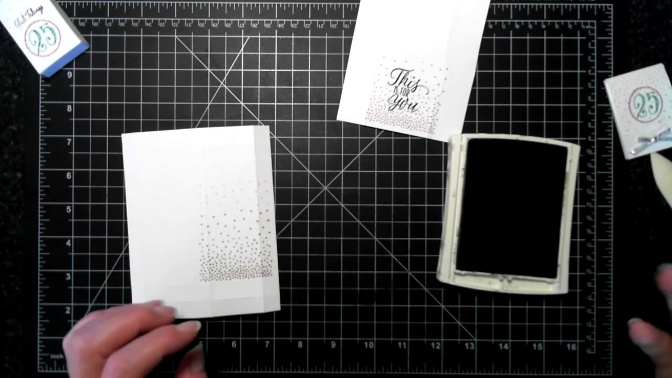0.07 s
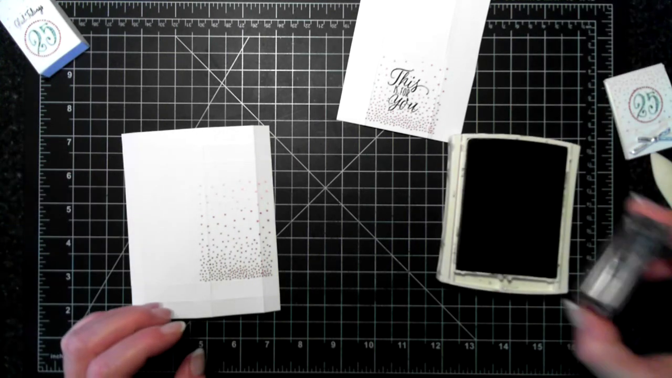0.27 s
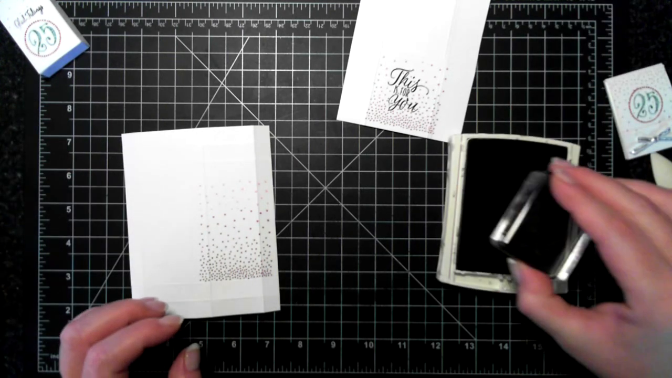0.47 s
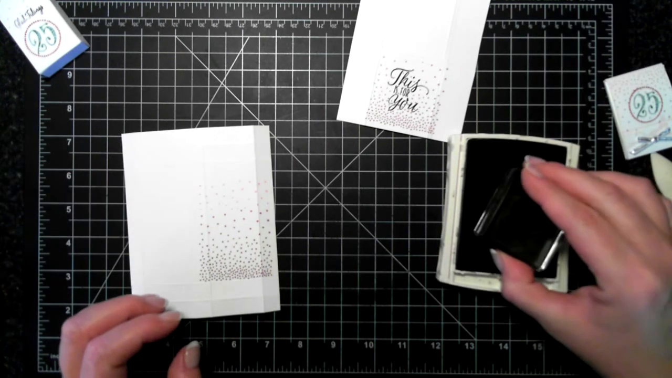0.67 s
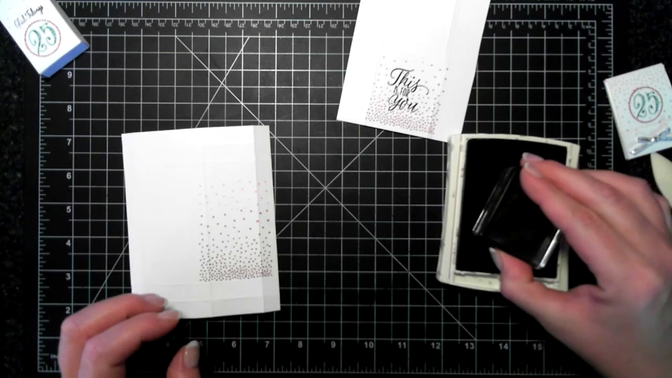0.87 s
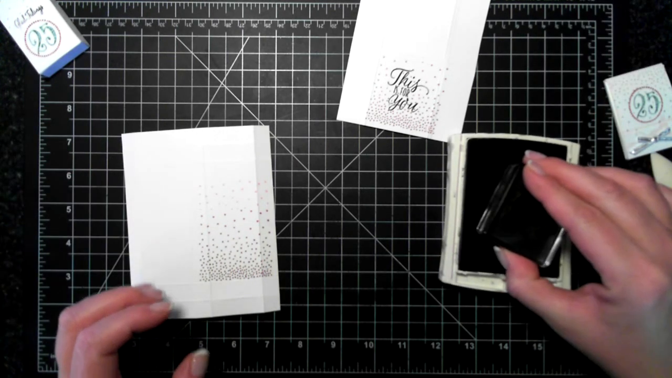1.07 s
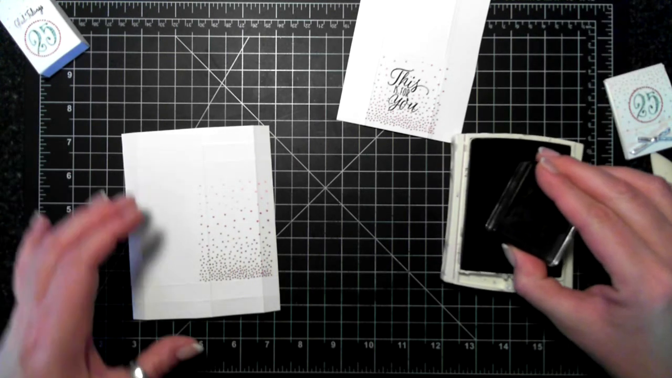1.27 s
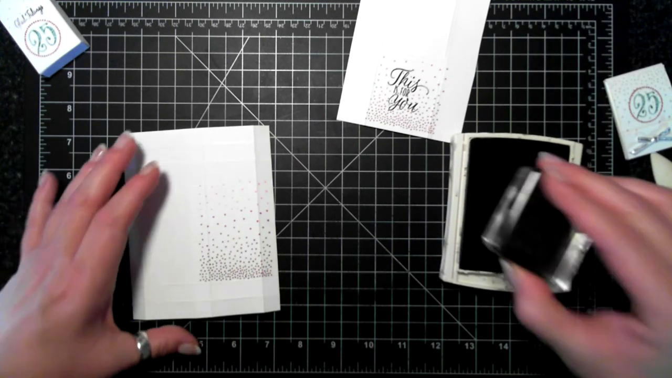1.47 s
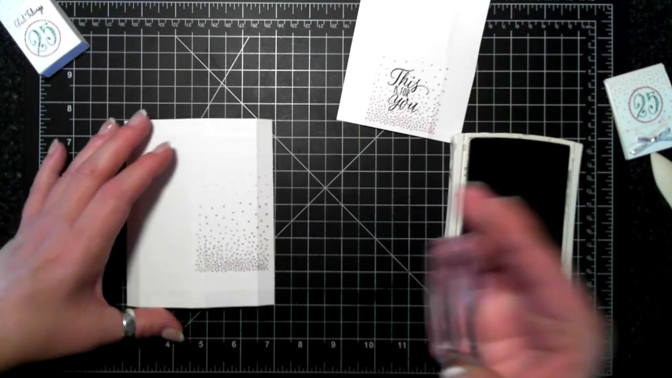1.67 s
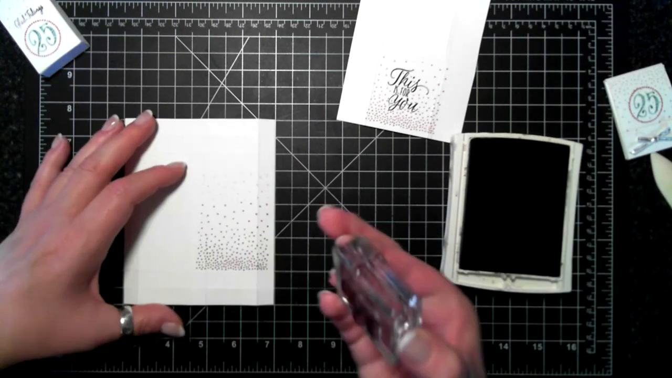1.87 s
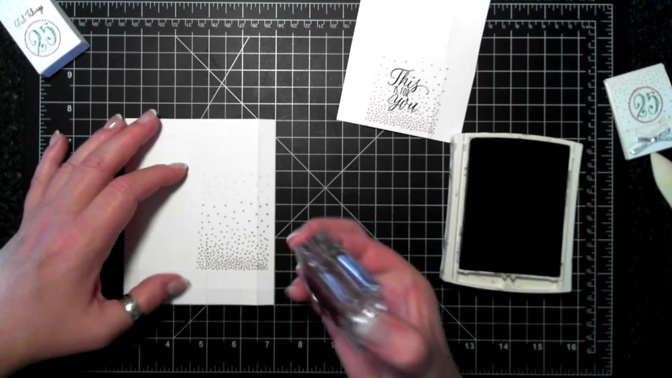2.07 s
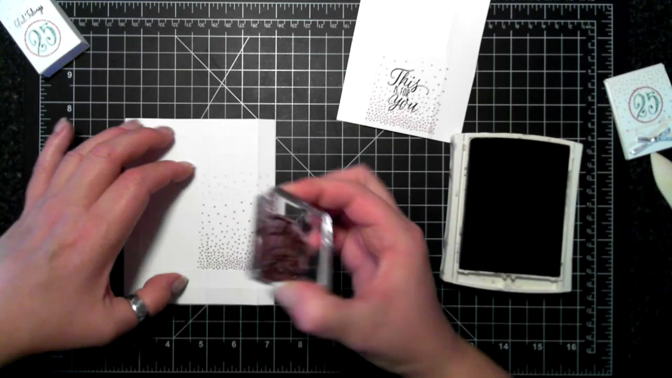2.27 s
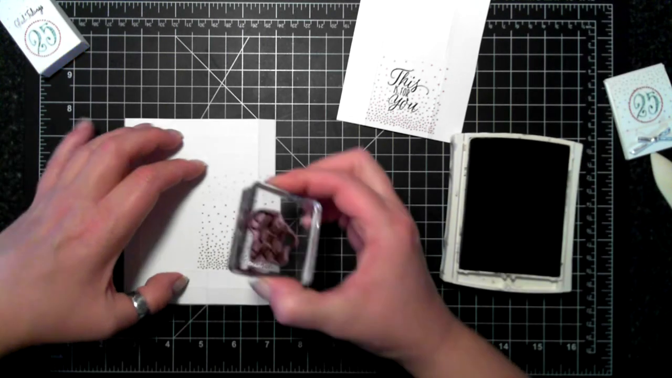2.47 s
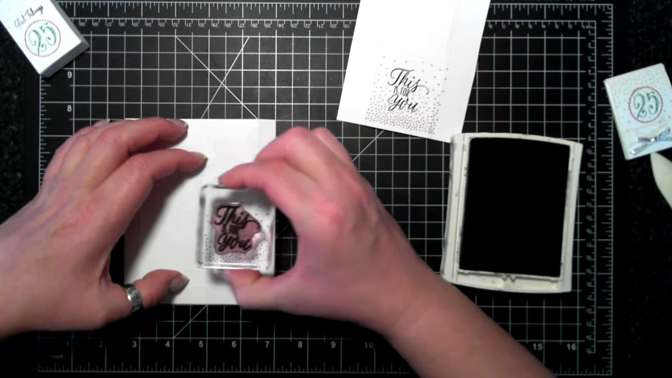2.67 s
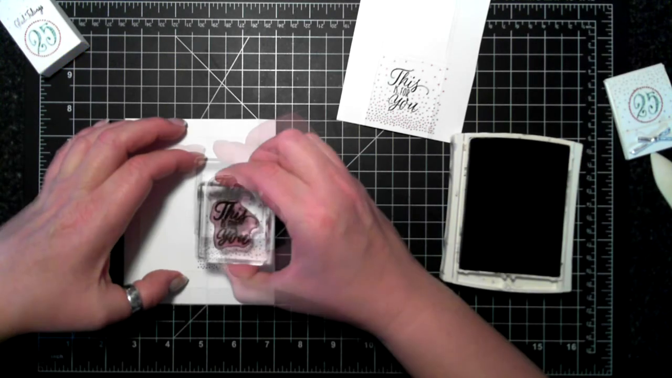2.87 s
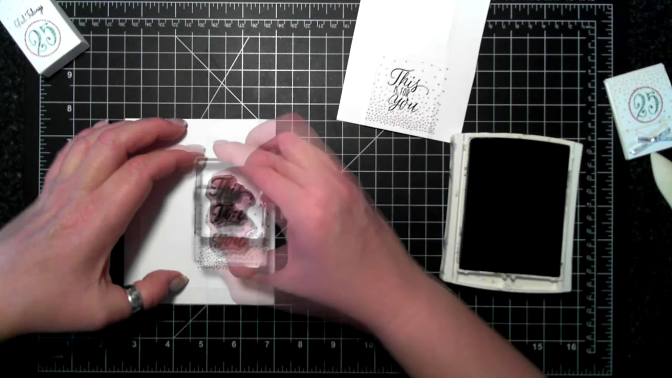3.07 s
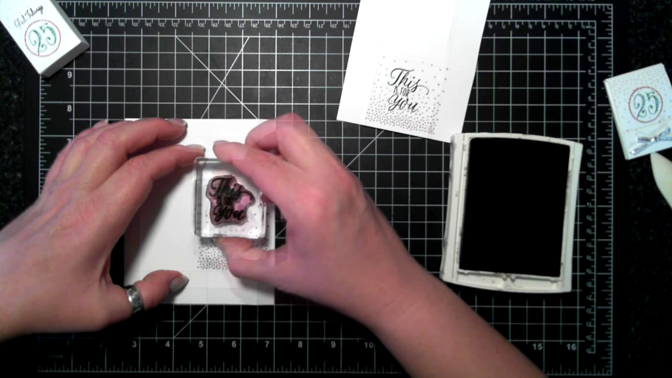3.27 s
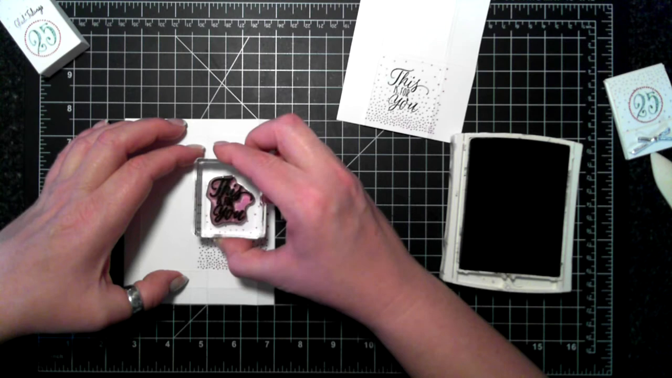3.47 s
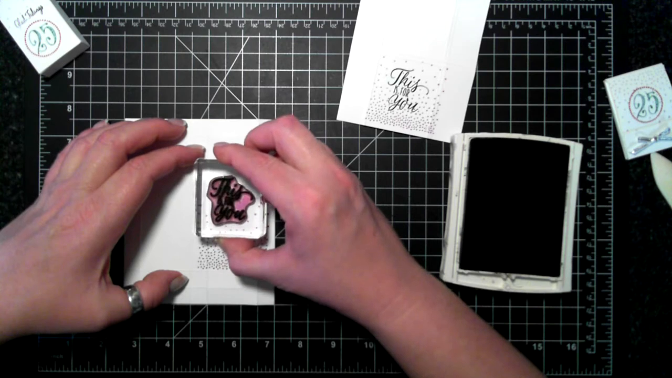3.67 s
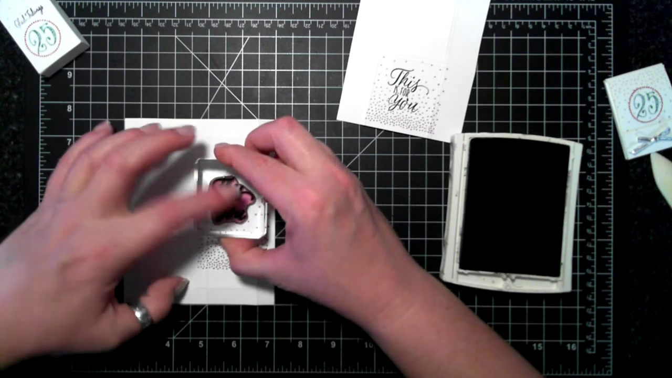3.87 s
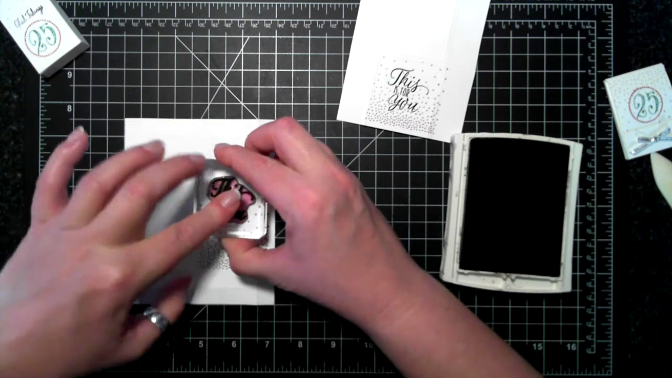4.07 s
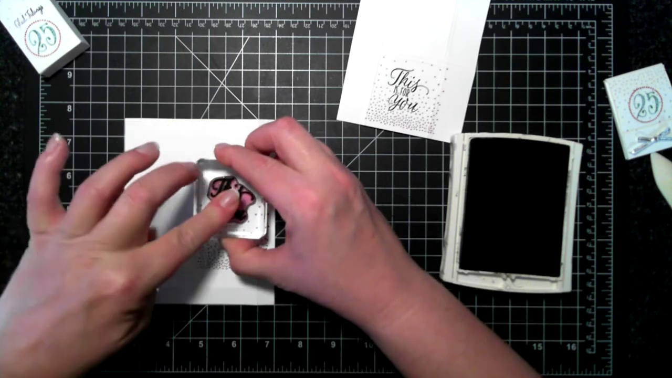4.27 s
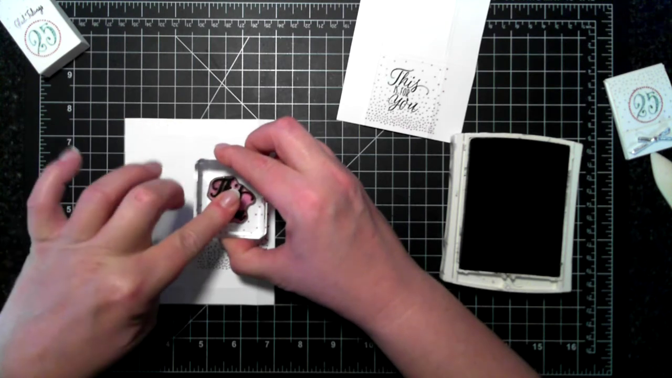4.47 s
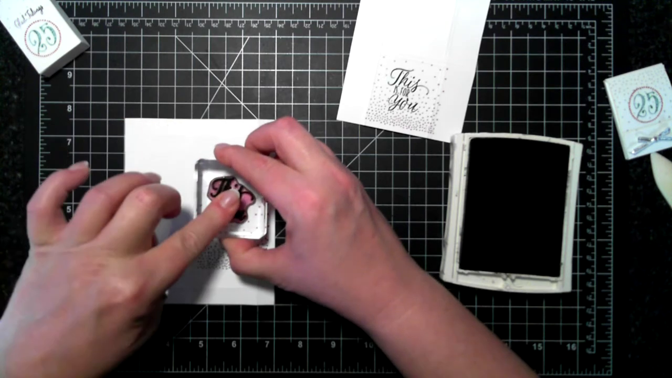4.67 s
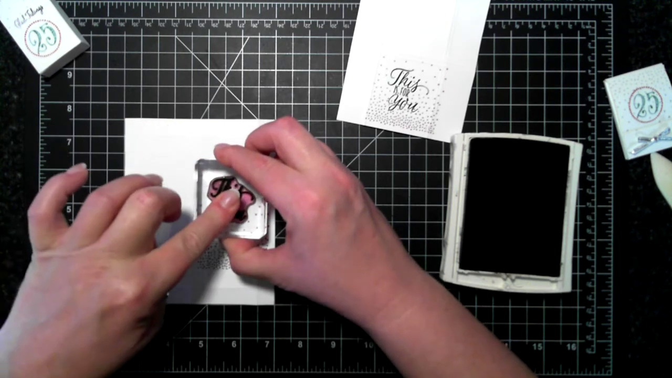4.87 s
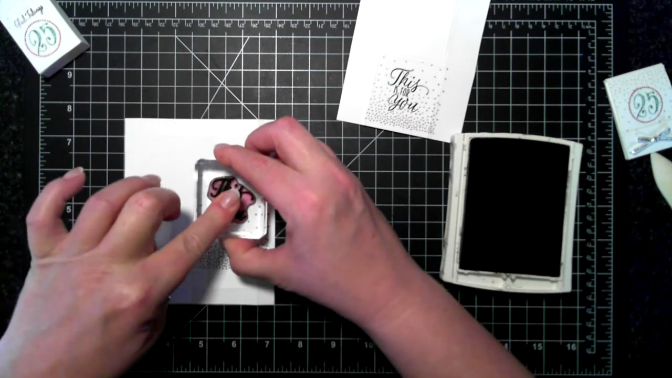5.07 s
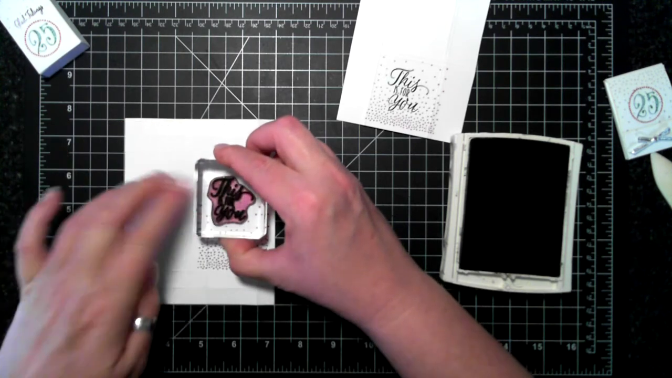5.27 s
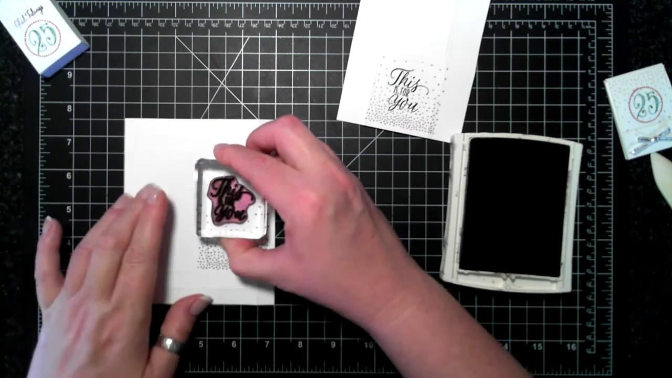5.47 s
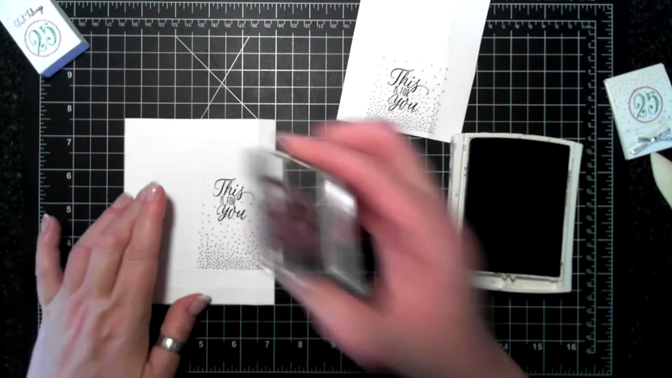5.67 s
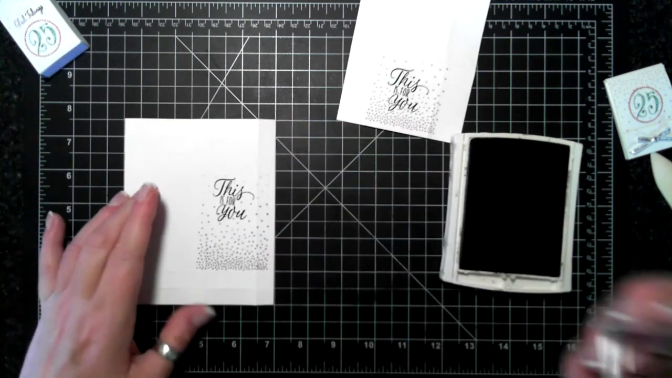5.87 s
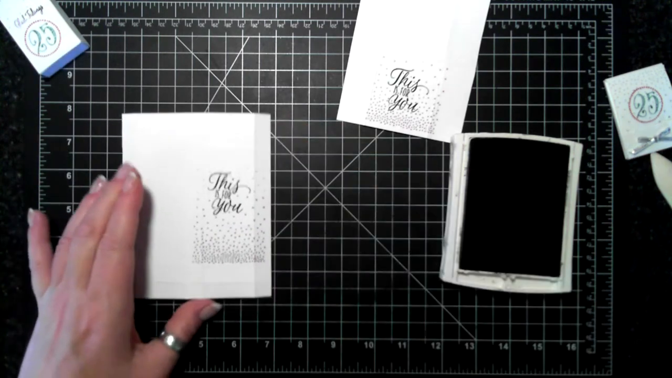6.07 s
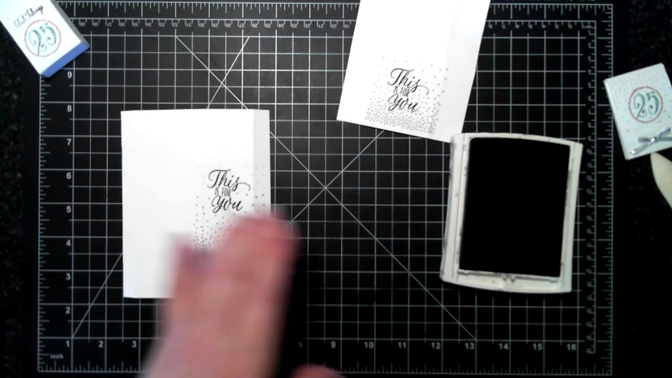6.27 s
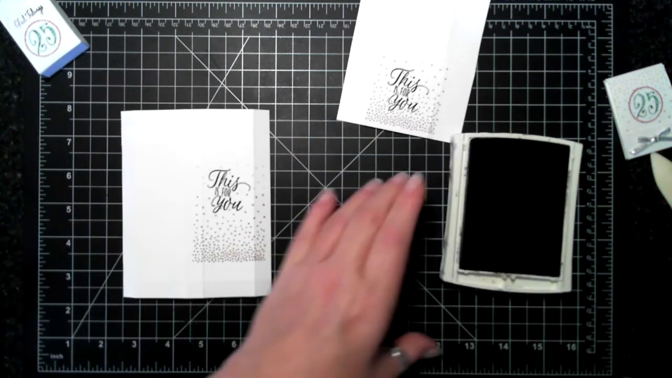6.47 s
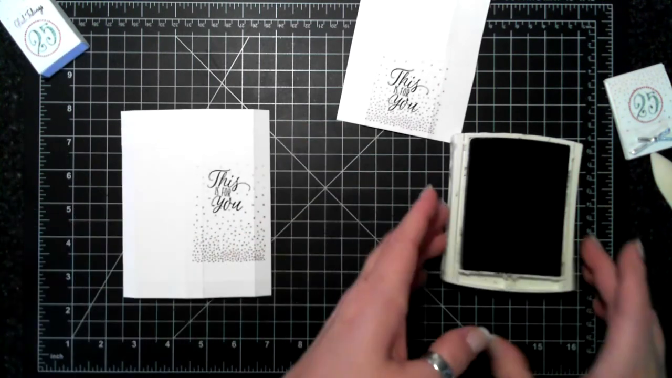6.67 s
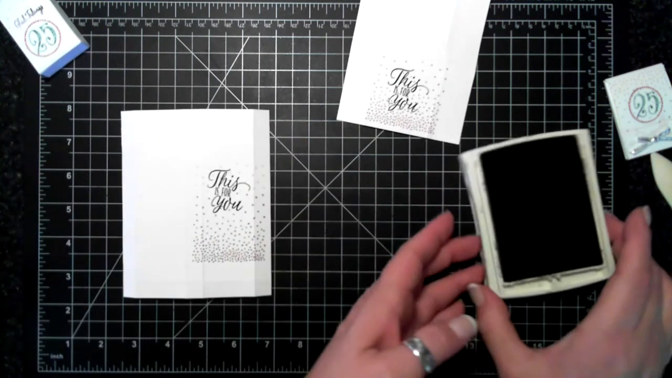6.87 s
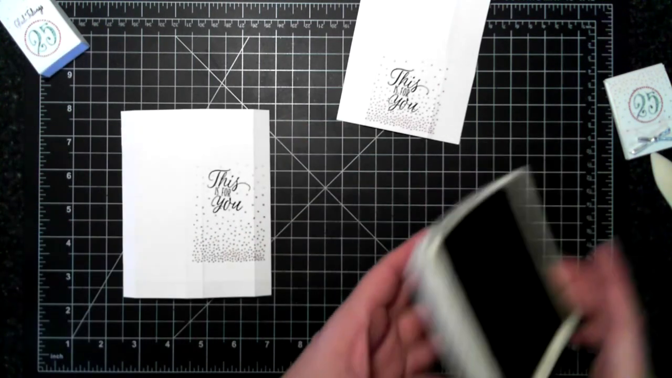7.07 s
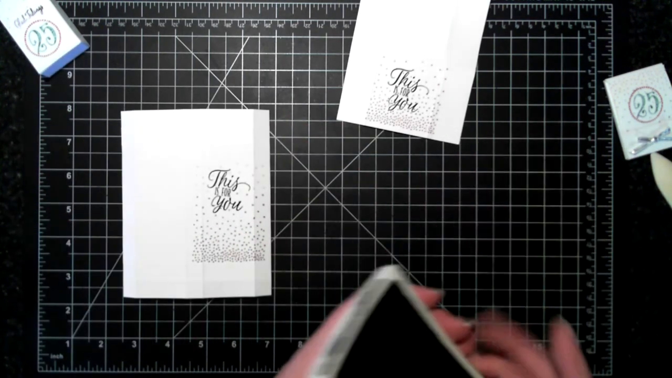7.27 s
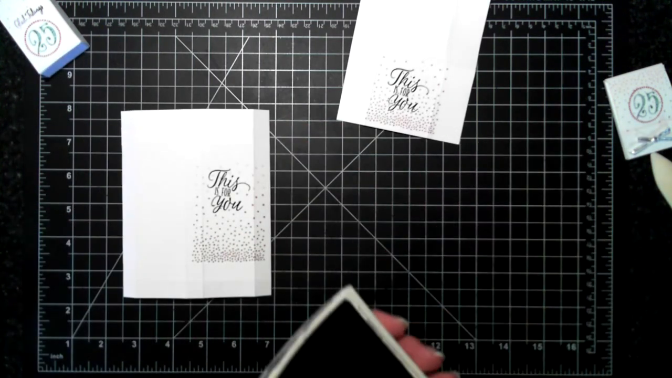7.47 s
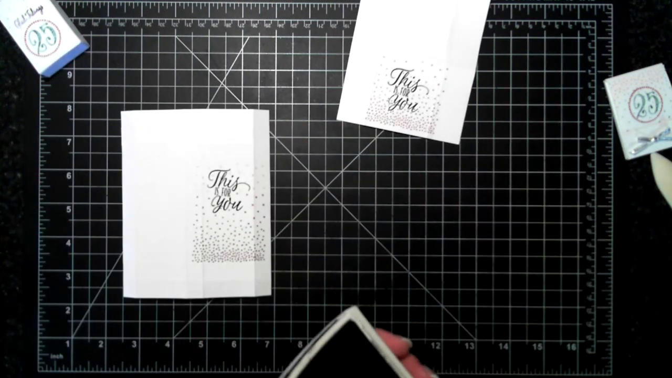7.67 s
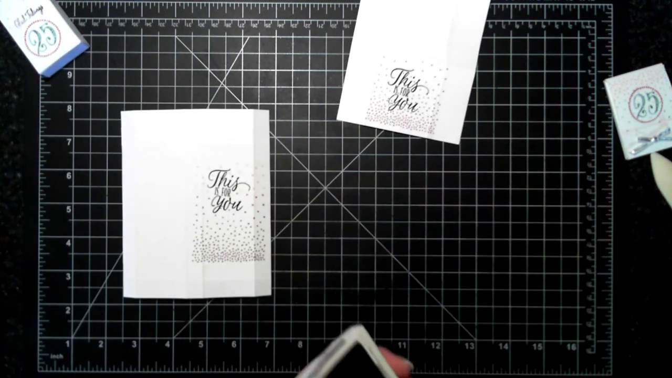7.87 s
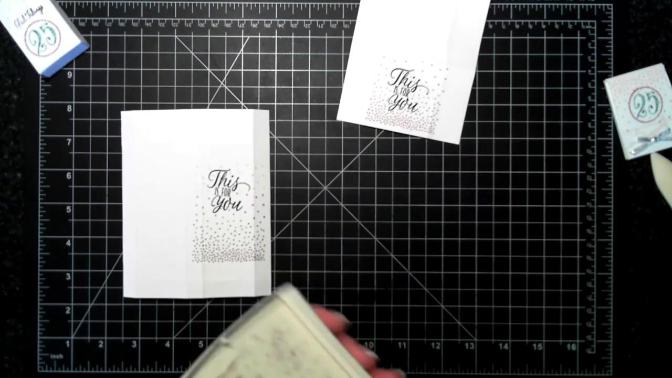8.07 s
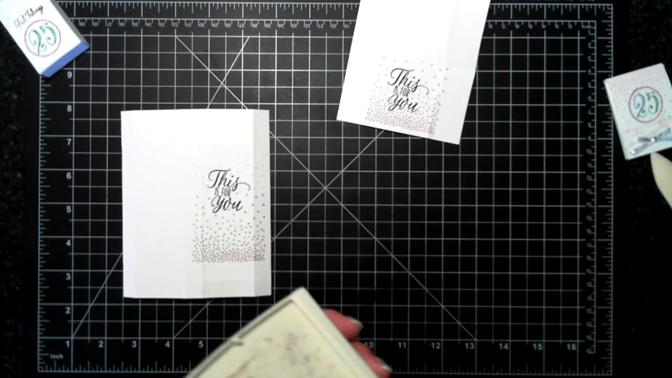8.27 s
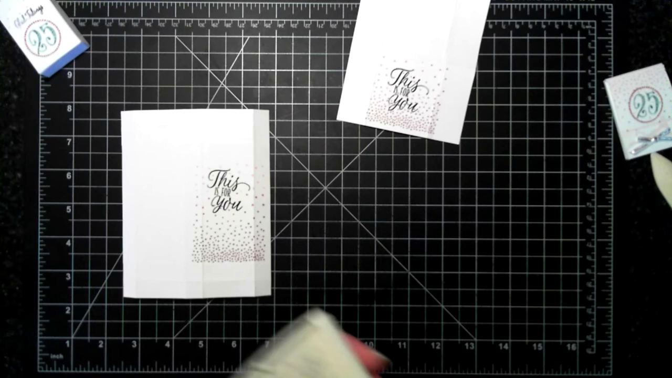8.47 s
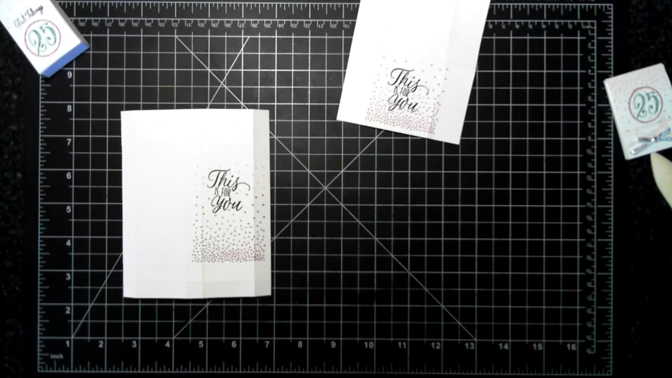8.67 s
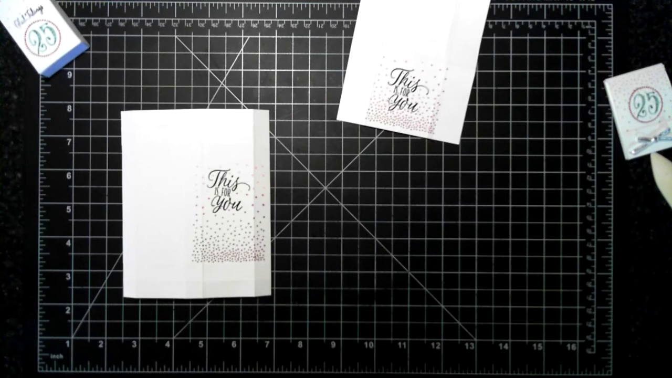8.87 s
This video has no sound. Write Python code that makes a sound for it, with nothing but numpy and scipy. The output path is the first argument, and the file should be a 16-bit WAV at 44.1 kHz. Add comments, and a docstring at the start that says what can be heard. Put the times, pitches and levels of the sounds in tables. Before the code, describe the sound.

A stamp block is dabbed five times on a plastic ink pad, each dab a dull knock with a sticky lighter release. Card slides briefly on a mat; the block settles with a soft thump and is pressed quietly. It peels off with a bright dry tick, drops hard with quick bounces, and the pad case clatters closed. Low hum throughout, short dry room, one microphone above the desk.

```python
"""Hands tap an acrylic stamp block on an ink pad, press it on card, peel it off, drop it on the desk
and then shut the pad's plastic case. A motor hums in the quiet room; one microphone hangs above the desk.
Knocks are short noisy rattles that ring the modes of case, block or card; thumps are soft pushes on the desk.
Rubs are noisy slips heard through the rubbed thing. The hum is wavering sines, the air is shaped noise,
and decaying sparse taps give the room's echoes."""
import sys
import numpy as np
from scipy import signal
from scipy.fft import rfft, irfft
from scipy.io import wavfile
from scipy.ndimage import uniform_filter1d

SR = 44100
rng = np.random.default_rng(int(sys.argv[2]) if len(sys.argv) > 2 else 0)


def generate_wav(signal):
    """Clip the signal to [-1, 1] and save it as 16-bit WAV at the path in sys.argv[1]."""
    frames = np.transpose(np.atleast_2d(signal))
    scaled = np.clip(frames, -1, 1) * 32767
    pcm = np.round(scaled).astype(np.int16)
    wavfile.write(sys.argv[1], SR, pcm)


N = 394342  # length [samples]


def gain_of(db):
    """Turns decibels into an amplitude factor."""
    return 10 ** (np.asarray(db) / 20)


def unit_rms(x):
    """Scales a sound to rms 1."""
    return x / np.sqrt(np.mean(x ** 2) + 1e-20)


def read_curve(points, hz):
    """Reads a curve along a logarithmic frequency axis."""
    point_hz, value = np.transpose(points)
    return np.interp(np.log(hz + 1), np.log(point_hz + 1), value)


def add(mix, start_s, sound):
    """Lays a sound into the mix, cut off at the end of the mix."""
    part = mix[round(start_s * SR):][:len(sound)]
    part += sound[:len(part)]


def without_bass(x, hz, order=2):
    """Takes away the bass below hz."""
    return signal.sosfilt(signal.butter(order, hz, "high", fs=SR, output="sos"), x)


def wander(top_hz):
    """Slow chance of rms 1: sines of random phase, the slowest largest."""
    t = np.arange(0, N, 256) / SR
    slow = np.zeros(len(t))
    for hz in np.geomspace(top_hz / 20, top_hz, num=20):
        slow += np.sin(2 * np.pi * (hz * t + rng.random())) / np.sqrt(hz)
    return np.interp(np.arange(N) / SR, t, unit_rms(slow))


def ring(modes, spread=0., tilt_db=0., favoured_hz=1000, favour_db=0., seconds=.07):
    """An object after one ideal blow: each mode is a pair of partials, which spread detunes by chance
    for a denser ring."""
    t = np.arange(int(seconds * SR)) / SR
    hz, db, t60 = np.repeat(modes, 2, axis=0).T[:, :, None]
    t60 = np.minimum(t60, np.maximum(28 / hz, .008))  # hands and mat stop any long ring
    louder, higher = rng.standard_normal((len(hz), 2)).T[:, :, None]
    # the spot struck favours some modes
    spot_db = favour_db * np.exp(-(np.log2(hz / favoured_hz) / 0.21) ** 2)
    start_db = db + tilt_db * np.log2(hz / 1000) + spot_db + spread * louder
    decay = gain_of(start_db - 60 * t / t60)
    partial_hz = hz * (1 + spread * higher / 50)
    return (decay * np.sin(2 * np.pi * partial_hz * t)).sum(axis=0)


def knocks(rows, modes, low_hz, rise_ms, contact_ms, cling, favour_db):
    """Each contact is a short rattle that rings the object; a hard one favours the high modes."""
    out = np.zeros(N)
    ms = 1000 * np.arange(4096) / SR
    pressure = (1 - np.exp(-ms / rise_ms)) * np.exp(-(ms / contact_ms) ** cling)
    for start_s, db, hardness_db, favoured_hz in rows:
        jolts = rfft(pressure * rng.standard_normal(len(ms)))
        # level the spectrum so that the rattle drives all modes alike
        even = jolts / np.sqrt(uniform_filter1d(abs(jolts) ** 2, size=25))
        rattle = irfft(even) * (ms < 4 * contact_ms + 2)
        body = ring(modes, 0.99, hardness_db, favoured_hz, favour_db)
        sound = without_bass(signal.fftconvolve(rattle, body), low_hz, order=4)
        # same energy as noise of the given rms level over the contact time
        sound *= np.sqrt(SR * contact_ms / 1000) / np.linalg.norm(sound)
        add(out, start_s, gain_of(db) * sound)
    return out


def stroke(rows, grain_db, lean):
    """Friction: dense slips of uneven size; pressure swells and ebbs in one arch, early for a lean under 1."""
    level = np.zeros(N)
    for start_s, length_s, db in rows:
        arch = np.sin(np.pi * np.linspace(0, 1, round(length_s * SR)) ** lean) ** 1.5
        add(level, start_s, gain_of(db) * arch)
    grain = unit_rms(uniform_filter1d(rng.standard_normal(N), size=150))
    slips = unit_rms(gain_of(grain_db * grain) * rng.standard_normal(N))
    return level, slips


def as_modes(peaks):
    """A wide resonance is a mode that dies fast."""
    return [(hz, db + 20 * np.log10(width), 2.2 / width) for hz, width, db in peaks]


def rubbing(rows, modes, grain_db, low_hz, lean, tilt_db=0., favour_db=0.):
    """Slips heard through the thing that is rubbed."""
    level, slips = stroke(rows, grain_db, lean)
    body = ring(modes, tilt_db=tilt_db, favoured_hz=920, favour_db=favour_db)
    heard = signal.oaconvolve(slips, body)[:N]
    return level * unit_rms(without_bass(heard, low_hz))


# Slow swell of hum and air: (time [s], level [dB])
SWELL = [(0, 4), (1.3, 2.), (2.5, 2.5), (4.5, 1.3), (5.6, 2), (6.5, 2.1), (7.5, 1.6), (8.3, 3), (8.94, 5)]


def swell_db():
    """The room tone's level glides from point to point."""
    return np.interp(np.arange(N) / SR, *np.transpose(SWELL))


# Motor tones: (frequency [Hz], rms level before the swell [dB], wavering [dB rms])
MOTOR_TONES = [(58.6, -37, -0.37), (120.6, -47.5, 2.36), (223.5, -58, -0.7), (299.5, -64.5, 3.5),
               (357, -70, -0.5)]


def motor_hum():
    """Low motor tones, each one a sine that wavers in level."""
    t = np.arange(N) / SR
    hum = np.zeros(N)
    for hz, db, waver_db in MOTOR_TONES:
        level = np.sqrt(2) * gain_of(db + waver_db * wander(27.0))
        hum += level * np.sin(2 * np.pi * (hz * t + rng.random()))
    return gain_of(swell_db()) * hum


# Colour of the air's rush: (frequency [Hz], relative level [dB per Hz])
AIR_COLOUR = [(12, -39), (20, -1.5), (43, -12.5), (68, -8.5), (138, -18), (172, -22), (228, -20.5),
              (337, -28), (542, -33), (1060, -38), (1400, -41), (3530, -49), (10500, -55.5), (12400, -48.5),
              (16000, -75.5)]
AIR_DB = -43.5  # rms level before the swell


def air_rush():
    """Moving air: noise coloured by the curve, with soft patches in time and pitch."""
    frames, hz = N // 512 + 5, np.fft.rfftfreq(2048, 1 / SR)
    real, imaginary, patches = rng.standard_normal((frames, len(hz), 3)).T
    patches = uniform_filter1d(patches, size=20, axis=0)  # across frequency
    patches = unit_rms(uniform_filter1d(patches, size=8, axis=1))  # across time
    colour = gain_of(read_curve(AIR_COLOUR, hz)[:, None] + .8 * patches)
    air = signal.istft((real + 1j * imaginary) * colour, nperseg=2048, noverlap=1536)[1]
    return gain_of(AIR_DB + 1.28 * swell_db()) * unit_rms(air[:N])


def microphone_hiss():
    """The microphone's own steady white noise."""
    return gain_of(-66) * rng.standard_normal(N)


# Decay of the room: (frequency [Hz], time to fall 60 dB [s])
ROOM_DECAY = [(200, 0.38), (530, 0.21), (1390, 0.23), (3680, 0.21), (9700, 0.18)]


def echo_tail(build_ms):
    """Sparse taps of random sign, one in every 10 samples, that build up and then die band by band."""
    taps = np.zeros(SR // 3)
    at = np.arange(0, len(taps) - 10, 10)
    taps[at + rng.integers(0, 10, len(at))] = rng.choice([-1., 1.], len(at))
    taps *= 1 - np.exp(-(1000 * np.arange(len(taps)) / SR / build_ms) ** 2)
    hz, t, bands = signal.stft(taps, SR, nperseg=256)
    fade = gain_of(-60 * t / read_curve(ROOM_DECAY, hz)[:, None])
    decayed = signal.istft(bands * fade, SR, nperseg=256)[1]
    return decayed / np.linalg.norm(decayed)


def room(x, build_ms):
    """The sound passes steadily among three sets of echoes, which makes the room's tail more diffuse."""
    turn = 2 * np.pi * 23 * np.arange(N) / SR
    echoes = np.zeros(N)
    for k in range(3):
        share = np.sqrt(2 / 3) * np.cos(turn + k * np.pi / 3)  # the squared shares add up to 1
        echoes += signal.oaconvolve(x * share, echo_tail(build_ms))[:N]
    return echoes


# Desk top modes: (frequency [Hz], relative level [dB], longest time to fall 60 dB [s])
DESK_MODES = [(57.9, -37, 0.13), (125, 7.5, 0.029), (169.4, -12, 0.11), (259, 2, 0.03),
              (291.5, -17.5, 0.013)]


def thumps(rows):
    """A soft push sets the desk top swinging."""
    out = np.zeros(N)
    for start_s, db, push_ms in rows:
        push = np.hanning(round(push_ms * SR / 1000) + 3)
        desk = ring(DESK_MODES, spread=0.16, seconds=.2)
        swing = without_bass(signal.fftconvolve(desk, push), 88)
        add(out, start_s, gain_of(db) * swing / abs(swing).max())
    return out


# Other weight that comes down on the desk top: (time [s], peak level [dB], push [ms])
DESK_THUMPS = [(3.052, -28.5, 0.74), (3.852, -18, 5.3), (5.41, -26, 7.3), (6.229, -19.5, 2.6)]


def desk_thumps():
    """Weight comes down on the desk and its low modes answer."""
    return thumps(DESK_THUMPS)


# Fingers brush a surface: (start [s], length [s], top of the arch [dB rms])
SKIN_BRUSHES = [(2.16, 0.63, -55.5), (3.7, 0.13, -70), (3.97, 0.1, -70), (5.12, 0.054, -59.5),
                (5.175, .035, -62), (6.105, 0.091, -48.5), (6.56, .32, -55), (7.11, 0.087, -65),
                (7.2, 0.11, -59), (7.96, 0.17, -49)]
# Resonances that colour the skin: (frequency [Hz], width [Hz], relative level [dB])
SKIN_PEAKS = [(3240, 1200, 1.5), (5000, 4000, -5.5), (8640, 6000, -1.5), (12200, 5500, -12)]


def skin_brushes():
    """Soft, bright friction of fingers, through wide resonances."""
    return rubbing(SKIN_BRUSHES, as_modes(SKIN_PEAKS), grain_db=1.5, low_hz=2136, lean=0.52)


# The card slides over the mat: (start [s], length [s], top of the arch [dB rms])
SLIDES = [(1.525, 0.11, -40.5), (1.66, 0.16, -52), (1.79, 0.04, -48.5), (5.865, 0.042, -55),
          (5.915, 0.031, -47.5), (5.96, 0.16, -48)]
# Resonances of the mat: (frequency [Hz], width [Hz], relative level [dB])
MAT_PEAKS = [(1880, 260, 0), (2500, 500, -9), (3700, 350, -10), (5000, 1500, -16), (9000, 6000, -22)]


def card_slides():
    """Friction of card on mat, through the mat's wide resonances."""
    return rubbing(SLIDES, as_modes(MAT_PEAKS), grain_db=2.5, low_hz=1230, lean=.8)


# The card ticks under the fingers and snaps off the tacky stamp:
# (time [s], rms level over the contact [dB], hardness [dB per octave], favoured frequency [Hz])
SNAPS = [(1.741, -48, -6, 2310), (1.803, -50, 1, 2050), (2.053, -40.5, 4, 3220), (2.072, -36.5, -0.6, 4410),
         (2.389, -48, 1, 4080), (2.958, -25, 2.3, 1160), (5.121, -50.5, -4, 2490), (5.15, -47.5, 0, 1050),
         (5.201, -39.5, -3, 3800), (5.365, -36, 2.5, 3830), (5.376, -39, 25, 6050), (5.412, -46.5, 4, 1060),
         (5.484, -43, 4.5, 2900), (5.497, -25, 7, 2300), (5.504, -8.5, 10, 2900), (5.518, -19.5, 1, 2700),
         (5.923, -47, -13, 1700), (6.104, -27.5, -0.5, 3390), (6.858, -40.5, 0, 1000)]
# Card modes: (frequency [Hz], relative level [dB], longest time to fall 60 dB [s])
CARD_MODES = [(1200, 5.5, 0.0045), (2050, -29.5, 0.00286), (2600, 0, 0.018), (3340, 0.5, 0.0052),
              (4000, 10, 0.0033), (5610, 12, 0.0011), (7270, 5, 0.0036), (8800, -5.5, 0.0013),
              (12370, -18.5, 0.0044)]


def card_snaps():
    """Short dry contacts that ring the light card."""
    return knocks(SNAPS, CARD_MODES, low_hz=930, rise_ms=0.472, contact_ms=2.36, cling=0.77, favour_db=8.5)


# The case scrapes along the mat and in the hands: (start [s], length [s], top of the arch [dB rms])
SCRAPES = [(6.64, 0.14, -38), (6.77, 0.058, -39), (6.8, 0.068, -33), (6.9, 0.11, -51), (7.82, 0.041, -54),
           (7.872, 0.042, -41), (7.94, .18, -49), (8.465, 0.081, -35), (8.56, 0.09, -32), (8.65, 0.17, -51)]
# Plastic case modes: (frequency [Hz], relative level [dB], longest time to fall 60 dB [s])
CASE_MODES = [(550, -3.5, 0.015), (680, -5, 0.023), (980, 3, 0.09), (1127, 8.5, 0.024), (1384, 4, 0.017),
              (1653, 9.5, 0.0086), (2392, 14, 0.0048), (2890, 5, 0.0043), (3724, 8.5, 0.0035),
              (4560, 6, 0.0022), (6020, 3.5, 0.0013), (7750, -10, 0.0028), (9640, -21, 0.009)]


def case_scrapes():
    """Grainy friction through the plastic case, its high modes held down."""
    return rubbing(SCRAPES, CASE_MODES, grain_db=3.5, low_hz=199, lean=0.65, tilt_db=-6.0, favour_db=-1.0)


def firm_case_knocks(rows):
    """A quick firm contact rings the plastic case."""
    return knocks(rows, CASE_MODES, low_hz=397, rise_ms=0.57, contact_ms=3.65, cling=0.94, favour_db=12.0)


# Knocks of the case apart from the stamp's taps:
# (time [s], rms level over the contact [dB], hardness [dB per octave], favoured frequency [Hz])
OTHER_CASE_KNOCKS = [(6.65, -48, 9, 1900), (6.813, -33.5, -6, 929), (6.841, -44, -5, 934),
                     (6.877, -31, -3, 842), (6.894, -18.5, 1, 950), (7.254, -34, 2.1, 970),
                     (7.676, -28.5, 7, 1110), (7.824, -43.5, -6, 1073), (7.875, -26, -9, 1070),
                     (7.921, -15, 3, 1150), (7.945, -23, 6, 1210), (8.01, -25, 0.5, 543),
                     (8.05, -32.5, -5, 2670), (8.07, -30, -0.5, 1050), (8.25, -25, 1.5, 960),
                     (8.275, -29, -4, 533), (8.306, -5.5, 2.5, 670), (8.316, -11, 5, 1400),
                     (8.436, -28, -15, 554), (8.469, -17, -3.5, 480), (8.479, -18.5, -10, 715),
                     (8.519, -25, -9, 550), (8.542, -31, -1, 1160), (8.571, -27.5, -19, 1020),
                     (8.584, -19.5, -3.5, 1090), (8.604, -27.5, -19, 1150), (8.786, -19, 2, 1340)]


def case_knocks():
    """The case is knocked about and shut; each contact rings its plastic."""
    return firm_case_knocks(OTHER_CASE_KNOCKS)


# The block shifts on the card under the fingers: (start [s], length [s], top of the arch [dB rms])
RUBS = [(3.93, 0.25, -58.5), (5.07, 0.18, -57)]
# Acrylic block modes: (frequency [Hz], relative level [dB], longest time to fall 60 dB [s])
BLOCK_MODES = [(617, -1.5, 0.028), (983, -22, 0.0112), (1134, 7.5, 0.034), (1555, 10, 0.0084),
               (1930, -2, 0.0051), (2230, 4.5, 0.027), (2310, 8.5, 0.026), (2860, 7, 0.039),
               (3228, 4, .012), (4260, -20, .008), (5460, -19, 0.013), (7080, -4.5, 0.049),
               (8355, -36, .006), (10600, -33, 0.0032)]


def block_rubs():
    """Faint friction through the acrylic block, its high modes held down."""
    return rubbing(RUBS, BLOCK_MODES, grain_db=1.0, low_hz=300, lean=0.77, tilt_db=-7.0)


# The block touches the card, later lands on the desk and bounces:
# (time [s], rms level over the contact [dB], hardness [dB per octave], favoured frequency [Hz])
LANDINGS = [(2.451, -47, -7, 580), (2.685, -45.5, 4, 1350), (3.049, -38.5, -7.5, 433),
            (6.227, -0.5, 2.5, 2760), (6.25, -6, 2.4, 1070), (6.272, -4.5, 7, 1440)]


def block_knocks():
    """Short contacts that ring the acrylic block."""
    return knocks(LANDINGS, BLOCK_MODES, low_hz=284, rise_ms=0.52, contact_ms=2.55, cling=0.65, favour_db=6.5)


# The stamp pulls free of the ink and the case rattles back:
# (time [s], rms level over the contact [dB], favoured frequency [Hz])
STAMP_LIFTS = [(0.746, -30.5, 1000), (0.763, -37, 940), (0.901, -25.5, 1130), (0.909, -20.5, 1680),
               (1.056, -30.5, 930), (1.226, -45, 1100), (1.364, -38, 910)]


def stamp_lifts():
    """A slower, duller contact rings the case as the ink lets go."""
    rows = [(start_s, db, -3, hz) for start_s, db, hz in STAMP_LIFTS]  # hardness -3 dB per octave
    return knocks(rows, CASE_MODES, low_hz=490, rise_ms=1.4, contact_ms=5.5, cling=0.99, favour_db=11.0)


# The stamp comes down on the pad:
# (time [s], knock's rms level over the contact [dB], favoured frequency [Hz], desk push [ms])
STAMP_TAPS = [(0.606, -16.5, 1230, 2.2), (0.825, -22, 940, 5.1), (0.986, -14, 1100, 1.43),
              (1.129, -14, 910, 0.48), (1.293, -17.5, 980, 0.7)]
TAP_HARDNESS_DB = 2.5  # per octave
TAP_THUMP_DB, TAP_THUMP_LAG_S = 11, 0.0016  # thump's peak above the knock's level, and its delay


def tap_knocks():
    """Each tap of the stamp knocks the pad's case."""
    return firm_case_knocks([(start_s, db, TAP_HARDNESS_DB, hz) for start_s, db, hz, push_ms in STAMP_TAPS])


def tap_thumps():
    """Just after the knock, each tap thumps the desk."""
    return thumps([(start_s + TAP_THUMP_LAG_S, db + TAP_THUMP_DB, push_ms)
                   for start_s, db, hz, push_ms in STAMP_TAPS])


def scene():
    """Sums the handling, its echoes 12 dB down and the room tone."""
    hits = tap_knocks() + case_knocks() + stamp_lifts() + block_knocks() + card_snaps()
    rubs = card_slides() + case_scrapes() + block_rubs() + skin_brushes()
    handling = hits + rubs + tap_thumps() + desk_thumps()
    echoes = room(gain_of(-12.0) * handling, build_ms=3.3)
    room_tone = motor_hum() + air_rush() + microphone_hiss()
    return (handling + echoes + room_tone)[None]


def record(dry):
    """The microphone loses the deepest bass, the converter tops out softly; then the band limit."""
    held = 0.99 * np.tanh(without_bass(dry, 33, order=4) / 0.97)
    band_limit = signal.firwin(511, 16000, window=("kaiser", 9), fs=SR)  # lowpass at 16 kHz
    return signal.oaconvolve(held, band_limit[None], "same")


dry = scene()
out = record(dry)
generate_wav(out)
```